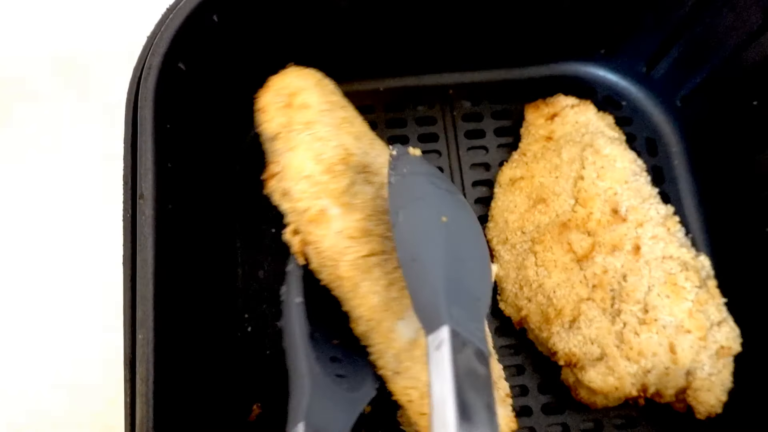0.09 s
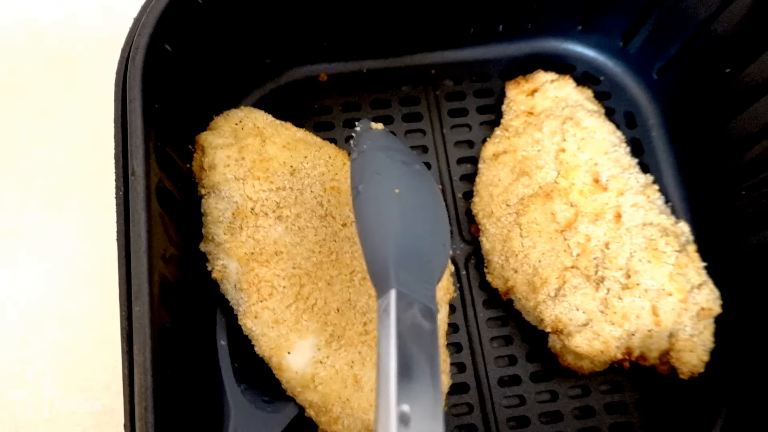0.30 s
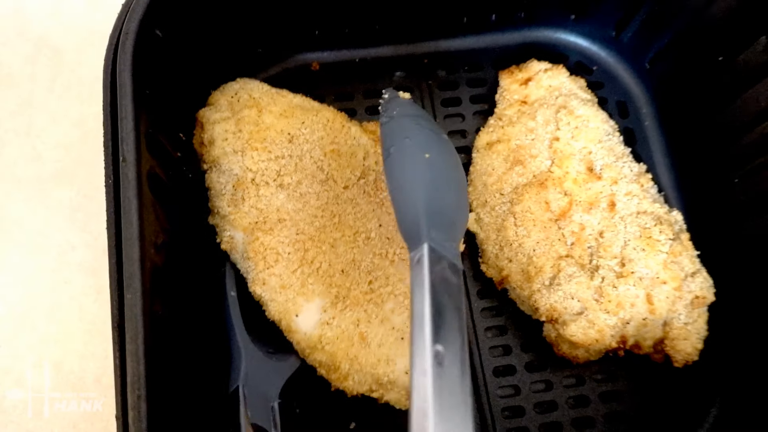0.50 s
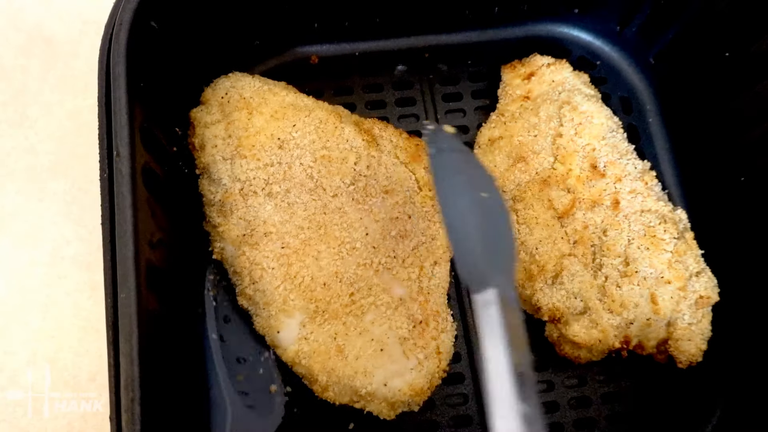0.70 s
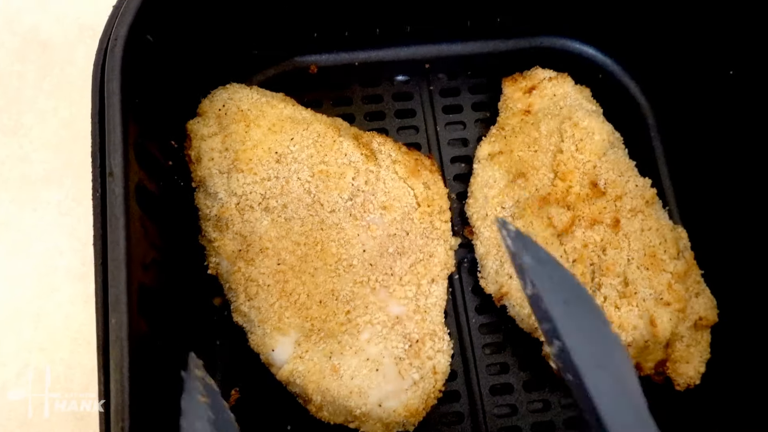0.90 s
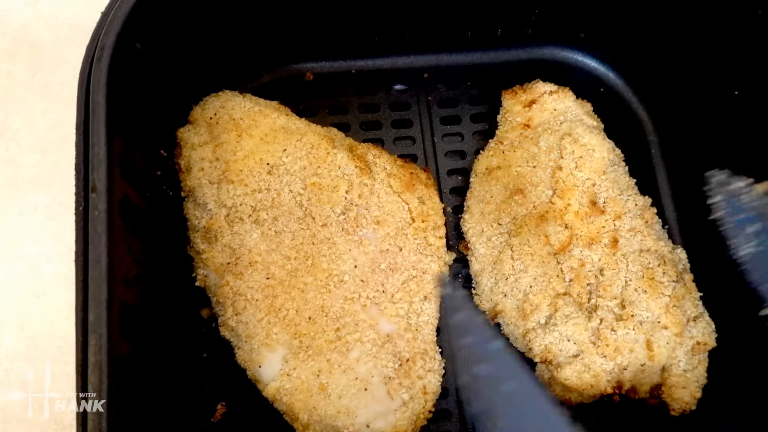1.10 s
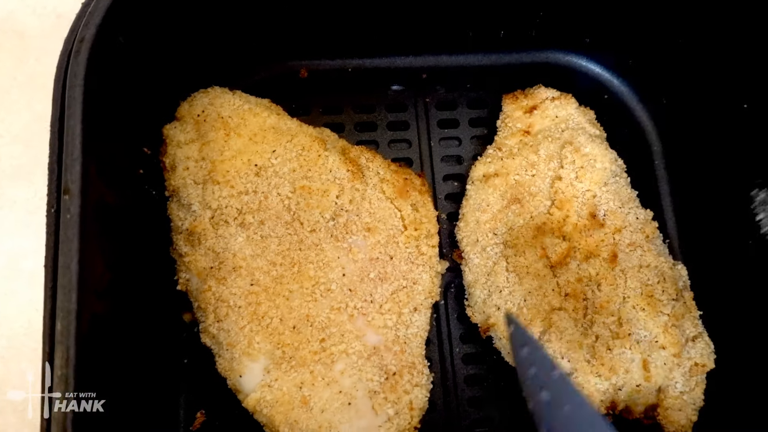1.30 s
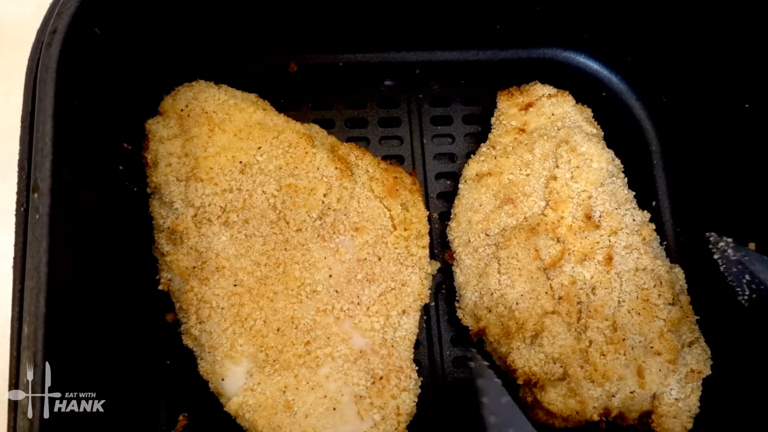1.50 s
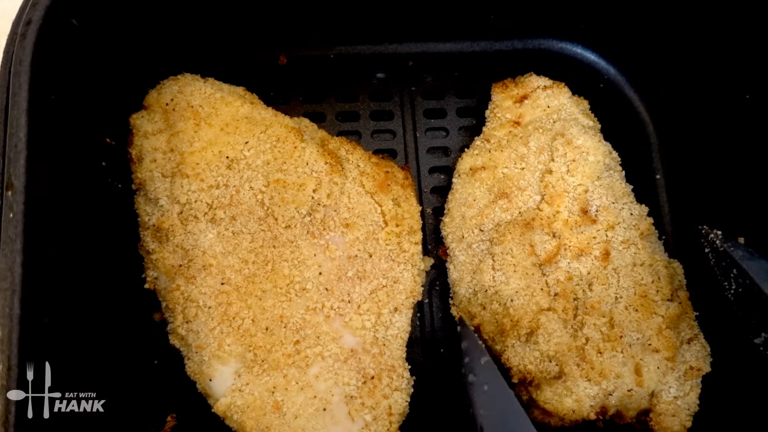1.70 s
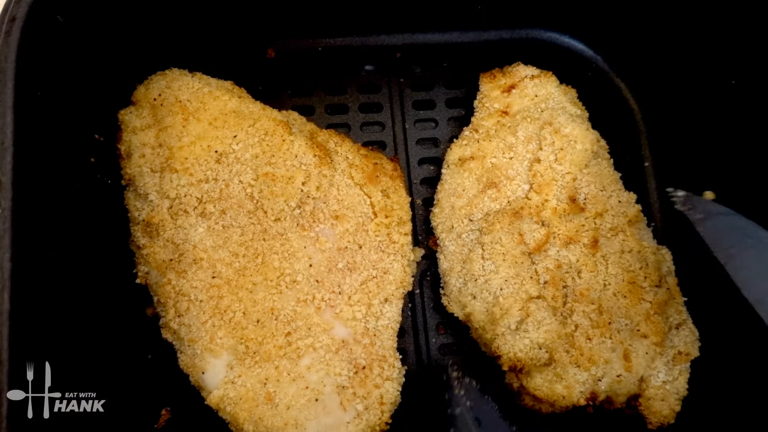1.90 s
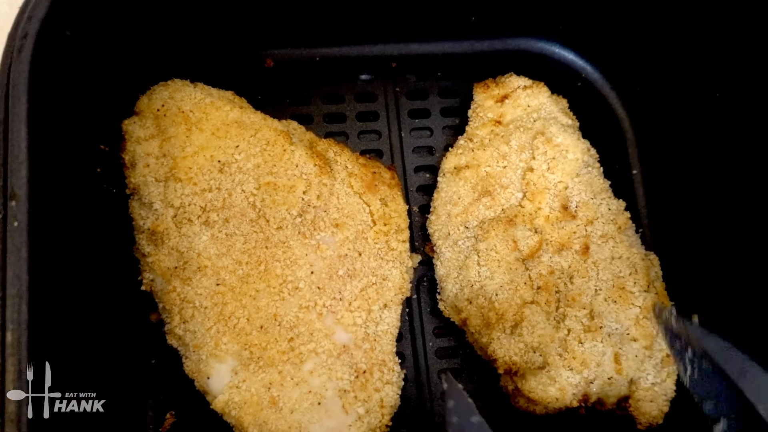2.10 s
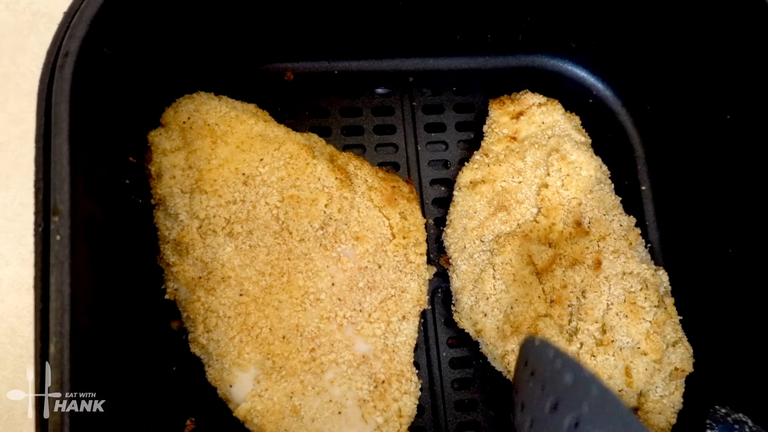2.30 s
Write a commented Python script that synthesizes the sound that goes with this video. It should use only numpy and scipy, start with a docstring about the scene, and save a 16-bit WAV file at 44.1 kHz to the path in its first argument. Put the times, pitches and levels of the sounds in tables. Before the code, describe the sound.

A breaded chicken piece scrapes and flops crunchily onto a hollow basket tray, gritty sliding follows, then a tong tick, dull soft knocks and a faint crumbly rustle; close microphone in a quiet kitchen with low hum.

```python
"""Breaded chicken turned with tongs in an air fryer basket, close up in a quiet kitchen.
One piece slides and flops with a crunch, then a second rustles faintly: grains of coloured noise over hiss.
The tongs tick (noise bursts), bump (pulses) and knock the hollow basket (decaying modes plus rattle).
Two microphone ports differ in delay, shading and scattered sound; room noise and a hum lie beneath."""
import sys
import numpy as np
from scipy import signal
from scipy.fft import rfft, irfft
from scipy.io import wavfile

SR = 44100
rng = np.random.default_rng(int(sys.argv[2]) if len(sys.argv) > 2 else 0)


def generate_wav(sig):
    """Save sig (samples, or channels by samples) to the path in sys.argv[1] as 16-bit PCM at SR."""
    pcm = np.round(np.clip(np.atleast_2d(sig).T, -1, 1) * 32767).astype(np.int16)
    wavfile.write(sys.argv[1], SR, pcm)


N = 101430
T = np.arange(N) / SR

# crumbs scraping as the first piece turns: t/s, level/dB
SCRAPE_LEVEL = [(0, -62.5), (.135, -63.5), (.164, -58.5), (.172, -47), (.212, -58), (.233, -38.5),
                (.258, -42), (.288, -43.5), (.32, -39), (.365, -45.5), (.42, -42.5), (.535, -40),
                (.587, -51.5), (.628, -40.5), (.65, -49), (.685, -58.5), (.72, -56), (.74, -66.5),
                (.78, -64.5), (.84, -78.5), (1.05, -85.5)]
# rustle along the second piece: t/s, level/dB
RUSTLE_LEVEL = [(1.0, -83), (1.19, -82), (1.25, -69.5), (1.36, -70), (1.39, -65), (1.47, -64.5),
                (1.52, -62), (1.7, -60.5), (1.96, -57.5), (2.03, -58), (2.3, -63)]
# piece sliding on the tray: t/s, level/dB
DRAG_LEVEL = [(0, -75.5), (.222, -71.5), (.232, -50), (.28, -58), (.35, -49.5), (.42, -56), (.55, -56),
              (.585, -61), (.63, -51.5), (.7, -63.5), (.76, -72), (.9, -80.5), (1.0, -86.5)]
# treble gain of scrape, rustle: t/s, gain/dB
SCRAPE_TREBLE = [(0, 3.5), (.24, -1), (.37, -2.5), (.415, 1), (.55, 0), (.7, -4), (.78, 5)]
RUSTLE_TREBLE = [(1.3, 1.5), (1.52, -1.5), (1.7, -1), (1.85, 2.5), (2.3, -2)]
# edges of the snaps' registers: f/Hz
REGISTERS_HZ = [2144, 4190, 7470, 12400]
# relative noise spectra: f/Hz, level/dB
DRAG_COLOUR = [(40, -23), (110, -5), (300, -6.5), (520, -3.5), (780, -1), (1000, 1), (1280, -6.5),
               (1550, -2), (2200, -12.5), (4000, -33.5)]
SCRAPE_COLOUR = [(100, -19.5), (600, -15), (1200, -17), (1700, -9), (2200, -6.5), (2480, 5.5), (2700, -0.5),
                 (2900, 1.5), (3400, -5), (4000, -7), (5200, -6), (7000, -8), (11000, -10.5), (13000, -19),
                 (15500, -13.5)]
RUSTLE_COLOUR = [(300, -14.5), (650, -4.5), (1150, -12.5), (1600, -5.5), (1830, 1), (2100, -5.5), (2370, 4),
                 (2750, -6), (3200, 2), (3700, -7), (4050, -1), (5200, -9.5), (6100, -8.5), (7000, -2),
                 (7900, -8.5), (8600, -4), (9400, -12), (10600, -5), (11900, -14), (13600, -8),
                 (15500, -11)]
FLOP_COLOUR = [(150, -15), (600, -6.5), (860, 3), (1200, -9), (1500, -2), (1900, -19.5), (2500, 6),
               (2950, 6.5), (3400, -7.5), (4000, -8), (4500, -8), (7000, -10), (10500, -15.5), (15000, -28)]
TICK_COLOUR = [(300, -25), (1400, -21.5), (2250, 4.5), (3000, -5), (3800, -9), (5000, 0), (6000, -15),
               (7400, -9.5), (11000, -14), (15500, -34)]
RATTLE_COLOUR = [(50, -35.5), (110, -4.5), (230, 0.5), (340, -5.5), (480, -7.5), (640, -6.5), (800, -18),
                 (1000, -15.5), (1500, -25.5), (2700, -28.5), (5000, -54.5)]
ROOM_COLOUR = [(20, -26.5), (45, -11.5), (95, 5), (200, -8.5), (480, -4), (800, -17.5), (2300, -20),
               (5000, -38), (15500, -46.5)]
# shading of the left port: f/Hz, left minus right/dB
SCRAPE_LEFT = [(150, 3), (400, -5.5), (800, -6), (2000, -4), (3300, -1.8), (4000, -4), (5000, -5),
               (6000, -10), (8000, -13.5), (15000, -20.5)]
RUSTLE_LEFT = [(300, -10), (900, -11.5), (1500, 4.5), (3300, -1.5), (3900, -14), (4800, 10), (6000, -15),
               (9000, -12), (12500, -19), (15500, -24.5)]
ROOM_LEFT = [(100, 1), (3000, -2), (12000, -3.5)]
BASKET_LEFT = [(150, 0), (350, -.5), (600, -3), (1200, -1), (3000, -1)]
# likeness of the two ports: f/Hz, likeness/0-1
LIKENESS = [(100, 1), (300, .98), (700, 0.68), (1400, 0.59), (3200, 1), (5000, 0.08), (15000, 0)]
# echoes inside the basket: delay/s, level/dB
WALL_ECHOES = [(.00168, -22), (.00275, -16), (.0042, -17), (.0069, -16)]
# crust crunches: t/s, level/dB, hold/s, decay/s
CRUNCHES = [(0.172, -45, 0.001, 0.0019), (0.218, -46.5, .006, .004), (0.227, -45, .005, .004),
            (0.409, -42, 0.004, 0.0059), (0.429, -46, 0.0012, .002), (0.544, -44.5, 0.0034, .003),
            (0.629, -46, 0.002, .003)]
# tong-tip ticks: t/s, level/dB
TICKS = [(0.8754, -41.5), (0.903, -63), (1.5103, -47.5), (1.642, -49), (1.6955, -59), (1.7345, -56),
         (1.7867, -51.5), (1.82, -57), (1.8655, -61), (1.961, -61)]
# basket modes: f/Hz, relative level/dB, t60/s
BASKET_MODES = [(129.8, -0.5, 0.28), (167.5, -3, 0.23), (224.5, -6.5, 0.29), (248.6, -4.5, 0.27),
                (329.7, -7.5, 0.35), (434.8, 0, 0.18), (492, -6, 0.12), (587, -2, 0.13), (635, -6.5, .13),
                (874, -6.5, .14), (992, -10, 0.4), (1000, -21.5, 0.26)]
# knocks on the basket: t/s, level/dB, low-pass f/Hz, rattle level/dB, damping by the meat/(dB/s, sign ignored)
KNOCKS = [(0.0169, -58.5, 220, -63.5, 4), (.164, -57, 200, -68, 0), (.3035, -32.5, 1280, -48.5, 230),
          (0.608, -45, 654, -56.5, 80), (0.6511, -42, 298, -58, 80), (0.866, -54, 603, -63.5, 1),
          (1.2497, -35, 170, -66, -1), (1.273, -43, 182, -66, -1), (1.296, -41.5, 220, -62.5, 38),
          (1.506, -38, 660, -48.5, 3), (1.5131, -35, 550, -47.5, 0), (1.5359, -41.5, 540, -53, 0),
          (1.5727, -38, 220, -60.5, 2), (1.655, -55, 280, -65, 0)]
# dull bumps of soft meat: t/s, peak/dB, width/s
BUMPS = [(0.0543, -44.5, 0.00067), (0.0584, -43, 0.0021), (0.213, -53, 0.0025), (0.3111, -35, 0.0015),
         (0.8745, -67, 0.00053)]
# tray and rim modes rung by the flop: f/Hz, level/dB, t60/s
RIM_MODES = [(205, -33.5, 0.12), (860.7, -34.5, 0.15), (1072, -42, 0.12), (2320, -39.5, .14),
             (2410, -46, 0.29), (2474, -28, 0.091), (2670, -40, 0.046), (2930, -44.5, 0.12),
             (3880, -42, 0.093), (3994, -35.5, .12)]

TREBLE_HZ, EDGE_HZ, BODY_CUT_HZ = 6000, 15900, 82
NARROW_SNAPS = 1.5  # power of one-register snaps against wide ones
PORT_DELAY_S = 0.000091
TICK_DECAY_S, RING_RISE_S = 0.0021, 0.0013
RATTLE_DECAY_S, RATTLE_RISE_S = 0.042, 0.0037
FLOP_S = .299
FLOP_THUMP_HZ, FLOP_THUMP_DB, FLOP_THUMP_S = 78.5, -40.5, 0.012  # weight of the piece landing
ROOM_DB, HUM_HZ, HUM_DB = -69, 59.2, -68
BASKET_DRAG_DB = -17.5


def amp(db):
    """Decibels to gain."""
    return 10 ** (np.asarray(db) / 20)


def unit(x):
    """Scale to rms 1."""
    return x / np.sqrt(np.mean(x ** 2) + 1e-20)


def level_curve(points):
    """Gain over time, interpolated in dB."""
    return amp(np.interp(T, *np.transpose(points)))


def read(points, hz):
    """Interpolate a spectrum on a log-frequency axis."""
    f, value = np.transpose(points)
    return np.interp(np.log(hz + 1), np.log(f + 1), value)


def add(mix, s, sound):
    """Mix a sound in at time s, in place."""
    part = mix[round(s * SR):][:len(sound)]
    part += sound[:len(part)]


def high_pass(hz):
    """Second-order Butterworth sections."""
    return signal.butter(2, hz, "high", fs=SR, output="sos")


def colour(x, points, size=4096):
    """Minimum-phase filter of unit energy with the given spectrum."""
    log_gain = np.log(amp(read(points, abs(np.fft.fftfreq(size, 1 / SR)))))
    spectrum = np.exp(np.conj(signal.hilbert(log_gain)))
    impulse = np.fft.ifft(spectrum).real[:size // 2]
    return signal.fftconvolve(x, impulse / np.linalg.norm(impulse))[:N]


def ports(direct, scattered, left_db):
    """Two ports: the left is later and shaded, and partly hears scattered sound, if any."""
    hz = np.fft.rfftfreq(N, 1 / SR)
    left = rfft(direct) * np.exp(-2j * np.pi * hz * PORT_DELAY_S)
    if scattered is not None:
        same = np.clip(read(LIKENESS, hz), 0, 1)
        left = same * left + np.sqrt(1 - same ** 2) * rfft(scattered)
    left *= amp(read(left_db, hz))
    return np.array([irfft(left, N), direct])


def burst(envelope, spectrum, left_db):
    """Coloured noise under an envelope, at both ports."""
    direct = colour(envelope * rng.standard_normal(N), spectrum)
    scattered = colour(envelope * rng.standard_normal(N), spectrum)
    return ports(direct, scattered, left_db)


def hold_decay(t, rise_s, hold_s, decay_s):
    """Linear rise times an exponential decay that starts after the hold."""
    return np.minimum(t / rise_s, 1) * np.exp(-np.maximum(t - hold_s, 0) / decay_s)


def ring(modes):
    """Decaying partials of a struck object, half a second long."""
    t = T[:SR // 2]
    return sum(amp(db - 60 * t / t60) * np.cos(2 * np.pi * hz * t) for hz, db, t60 in modes)


def kitchen():
    """Still room air as steady coloured noise, plus an appliance hum as one sine."""
    hum = amp(HUM_DB) * np.sqrt(2) * np.sin(2 * np.pi * HUM_HZ * T)
    return burst(amp(ROOM_DB), ROOM_COLOUR, ROOM_LEFT) + hum


def snap_power(per_s, spread_db, grain_s):
    """Random snaps of random size, each decaying exponentially; mean power 1."""
    size_db = spread_db * np.minimum(rng.exponential(1, N), 2)
    sizes = (rng.random(N) < per_s / SR) * amp(size_db)
    power = signal.lfilter([1], [1, -np.exp(-2 / (grain_s * SR))], sizes ** 2)
    return power / power.mean()


def crumbs(level, spectrum, left_db, per_s, spread_db, grain_s, hiss):
    """Crumbs snap over a rubbing hiss; some snaps are wide, others fill one register."""
    register = np.searchsorted(REGISTERS_HZ, np.fft.rfftfreq(N, 1 / SR))
    wide = snap_power(per_s, spread_db, grain_s)
    drive = np.zeros((2, N))
    for k in range(len(REGISTERS_HZ) + 1):
        narrow = NARROW_SNAPS * snap_power(per_s, spread_db, grain_s)
        grain = unit(np.sqrt(wide + narrow + hiss ** 2))
        noise = rng.standard_normal((2, N))
        drive += grain * irfft(rfft(noise) * (register == k), N)
    drive *= level_curve(level)
    direct, scattered = [colour(x, spectrum) for x in drive]
    return ports(direct, scattered, left_db)


def brighten(x, treble):
    """Treble rises and falls against the rest."""
    high = signal.sosfiltfilt(high_pass(TREBLE_HZ), x)
    return x + high * (level_curve(treble) - 1)


def walls(x):
    """Quick echoes between the basket walls ripple the spectrum; mean power gain 1."""
    hz = np.fft.rfftfreq(2 * N, 1 / SR)  # padded against wrap-around
    echoes = 1 + sum(amp(db) * np.exp(-2j * np.pi * hz * s) for s, db in WALL_ECHOES)
    echoes /= np.sqrt(np.mean(abs(echoes) ** 2))
    return irfft(rfft(x, 2 * N) * echoes)[:, :N]


def drag():
    """The piece slides on the tray: a low rub that keeps the basket modes ringing."""
    rub = burst(level_curve(DRAG_LEVEL), DRAG_COLOUR, BASKET_LEFT)
    modes = ring(BASKET_MODES)
    modes /= np.linalg.norm(modes)
    rung = signal.fftconvolve(rub, modes[None], axes=1)[:, :N]
    return rub + amp(BASKET_DRAG_DB) * rung


def basket():
    """Soft contacts ring low modes and shake the loose tray; meat bumps and thumps without ringing."""
    body, shake, t = np.zeros(N), np.zeros(N), T[:SR // 2]
    modes = ring(BASKET_MODES) * (1 - np.exp(-t / RING_RISE_S))
    modes = signal.sosfilt(high_pass(BODY_CUT_HZ), modes)
    for s, db, low_pass_hz, rattle_db, damping in KNOCKS:
        r = np.exp(-2 * np.pi * low_pass_hz / SR)
        knock = signal.lfilter([(1 - r) ** 2], [1, -2 * r, r * r], modes)
        add(body, s, amp(db - abs(damping) * t) * knock)
        add(shake, s, amp(rattle_db) * hold_decay(t, RATTLE_RISE_S, 0, RATTLE_DECAY_S))
    for s, db, width in BUMPS:
        u = (T - s) / width
        body -= amp(db) * (1 - u ** 2) * np.exp(-u ** 2 / 2)
    swell = t / FLOP_THUMP_S * np.exp(1 - t / FLOP_THUMP_S)
    add(body, FLOP_S, amp(FLOP_THUMP_DB) * swell * np.sin(2 * np.pi * FLOP_THUMP_HZ * t))
    return ports(body, None, BASKET_LEFT) + burst(shake, RATTLE_COLOUR, BASKET_LEFT)


def crunches(rise_s=0.00066):
    """Clumps of crust break in short, bright noise bursts."""
    envelope, t = np.zeros(N), T[:SR // 4]
    for s, db, hold_s, decay_s in CRUNCHES:
        add(envelope, s, amp(db) * hold_decay(t, rise_s, hold_s, decay_s))
    return burst(envelope, SCRAPE_COLOUR, SCRAPE_LEFT)


def flop(start_s=.2965, db=-24, rise_s=.001, hold_s=0.0067, decay_s=.007):
    """The piece lands flat: its crust is crushed (noise burst) and the tray rings (modes)."""
    crush = amp(db) * hold_decay(np.maximum(T - start_s, 0), rise_s, hold_s, decay_s)
    rim = np.zeros(N)
    add(rim, FLOP_S, ring(RIM_MODES))
    return burst(crush, FLOP_COLOUR, SCRAPE_LEFT) + ports(rim, None, SCRAPE_LEFT)


def ticks():
    """Tong tips click: noise with instant onset and exponential decay."""
    envelope = np.zeros(N)
    for s, db in TICKS:
        add(envelope, s, amp(db) * np.exp(-T[:SR // 10] / TICK_DECAY_S))
    return burst(envelope, TICK_COLOUR, SCRAPE_LEFT)


def scene():
    """Sum of all sources at the two ports; only the crust passes the wall echoes."""
    scrape = crumbs(SCRAPE_LEVEL, SCRAPE_COLOUR, SCRAPE_LEFT,
                    per_s=330, spread_db=7, grain_s=0.0039, hiss=0.87)
    rustle = crumbs(RUSTLE_LEVEL, RUSTLE_COLOUR, RUSTLE_LEFT,
                    per_s=220, spread_db=7, grain_s=0.0039, hiss=0.61)
    crust = brighten(scrape, SCRAPE_TREBLE) + brighten(rustle, RUSTLE_TREBLE) + crunches()
    return walls(crust) + drag() + flop() + ticks() + basket() + kitchen()


def record(dry):
    """Band limit: linear-phase low-pass at EDGE_HZ."""
    low_pass = signal.firwin(511, EDGE_HZ, window=("kaiser", 9), fs=SR)
    return signal.oaconvolve(dry, low_pass[None], "same")


dry = scene()
out = record(dry)
generate_wav(out)
```